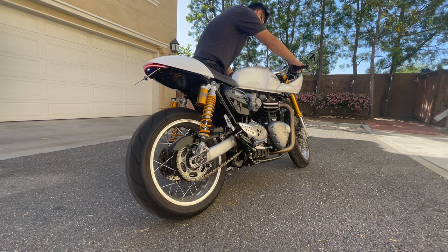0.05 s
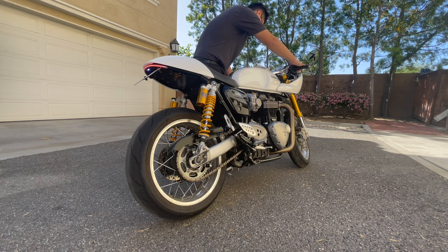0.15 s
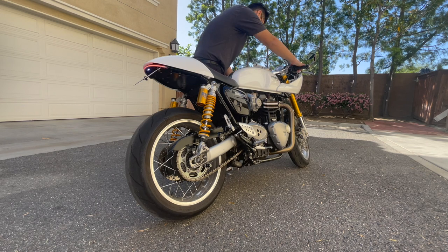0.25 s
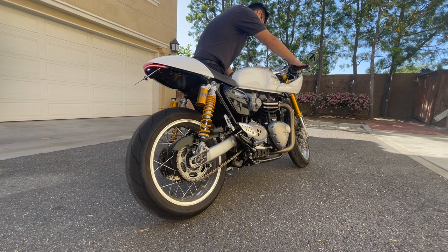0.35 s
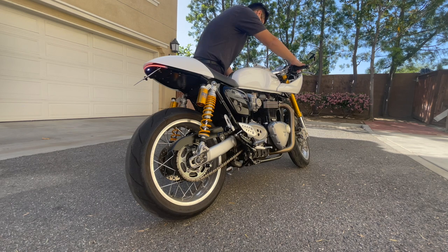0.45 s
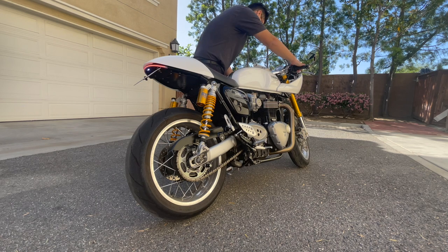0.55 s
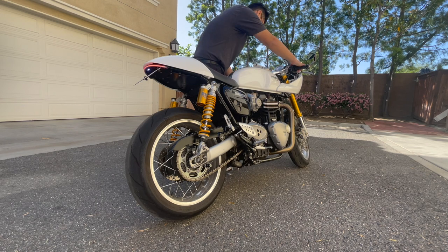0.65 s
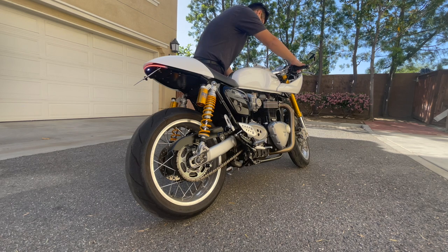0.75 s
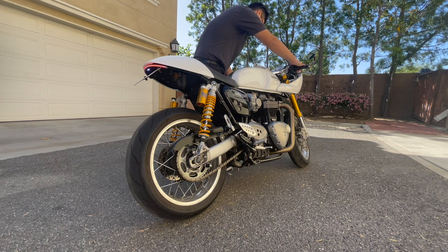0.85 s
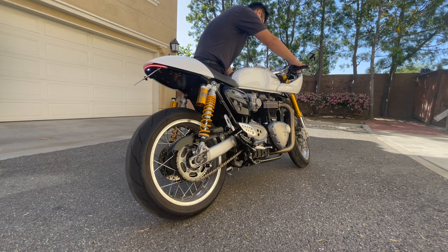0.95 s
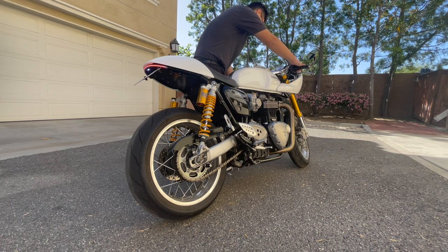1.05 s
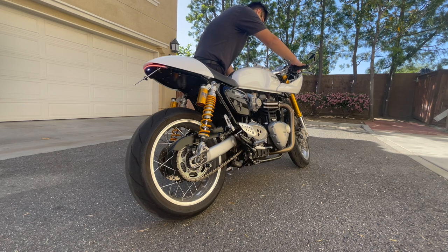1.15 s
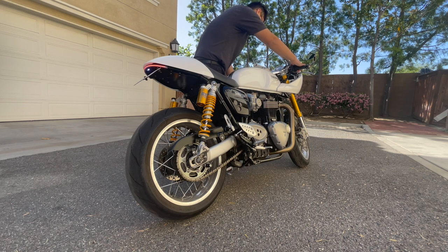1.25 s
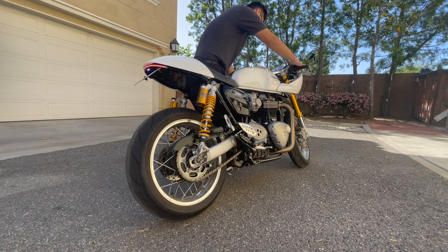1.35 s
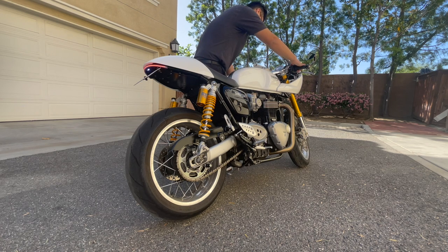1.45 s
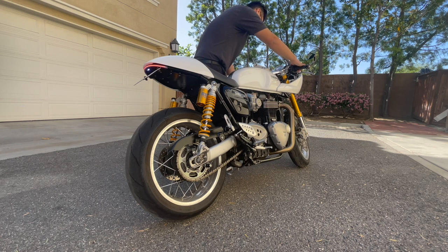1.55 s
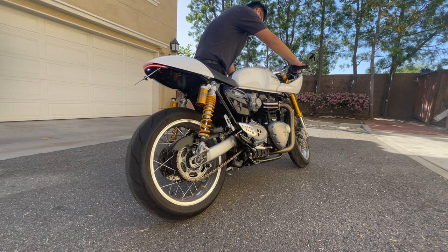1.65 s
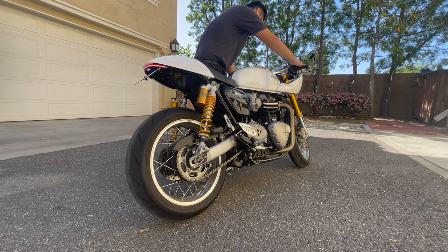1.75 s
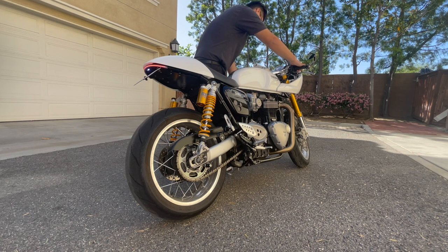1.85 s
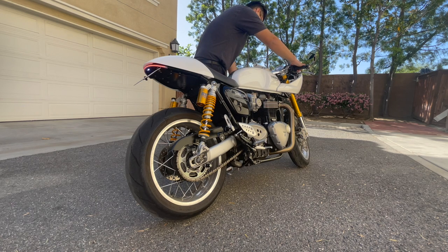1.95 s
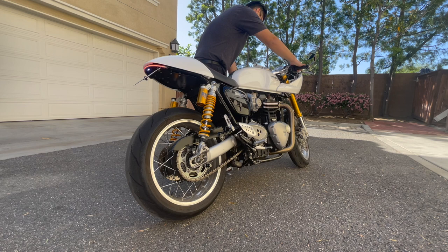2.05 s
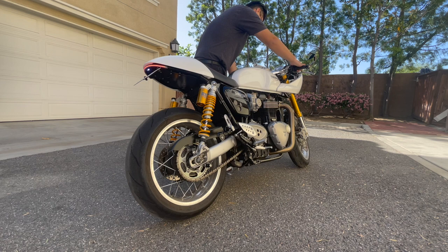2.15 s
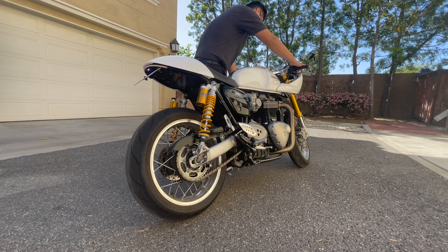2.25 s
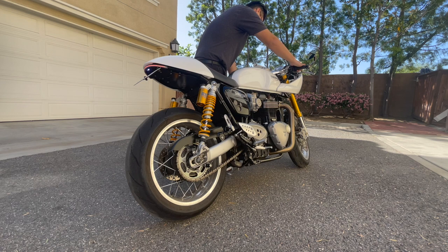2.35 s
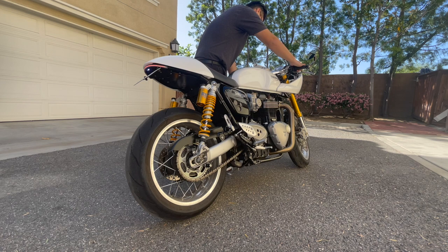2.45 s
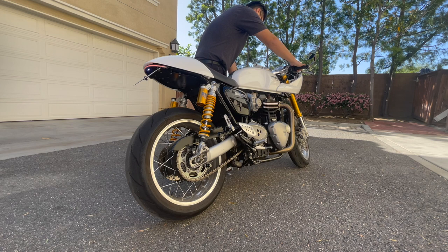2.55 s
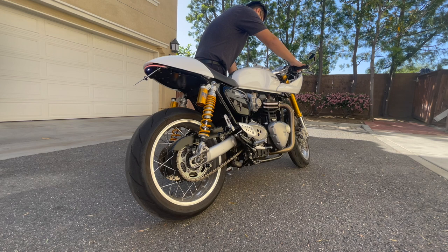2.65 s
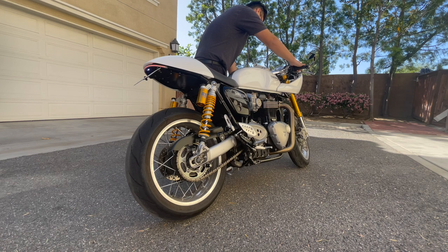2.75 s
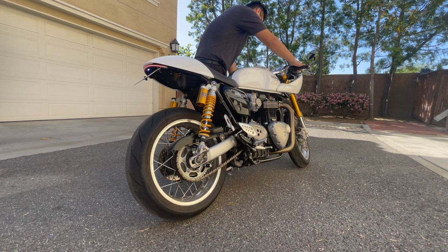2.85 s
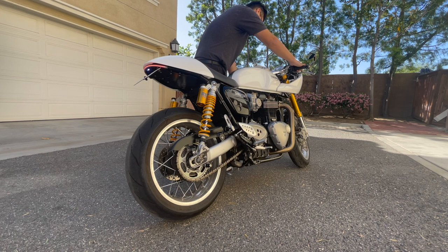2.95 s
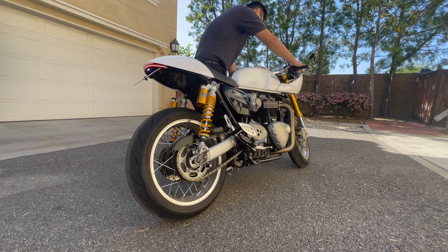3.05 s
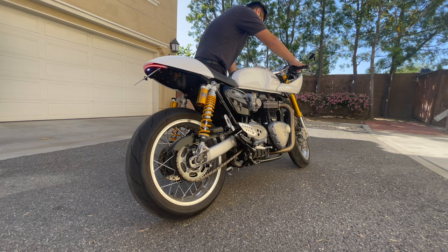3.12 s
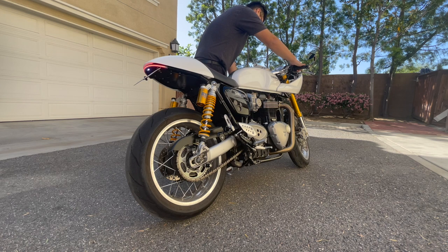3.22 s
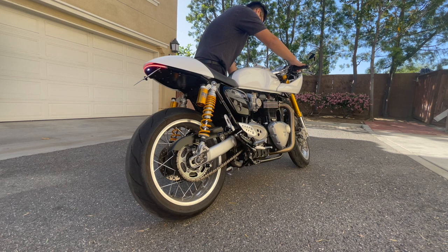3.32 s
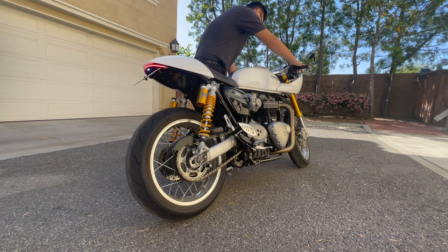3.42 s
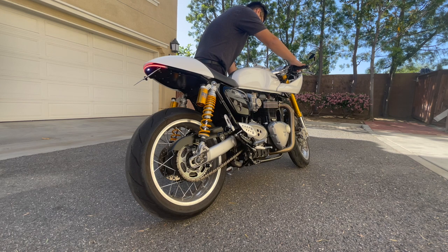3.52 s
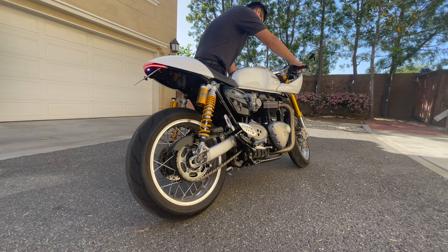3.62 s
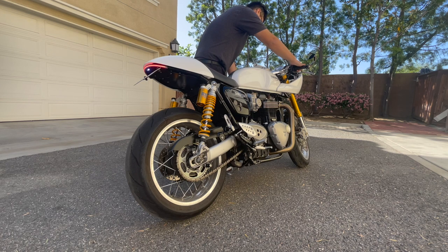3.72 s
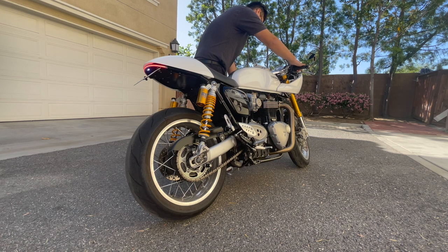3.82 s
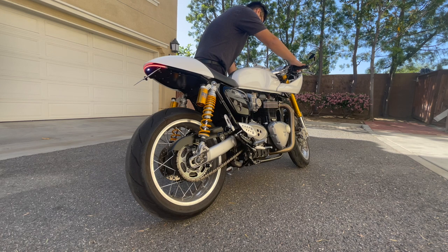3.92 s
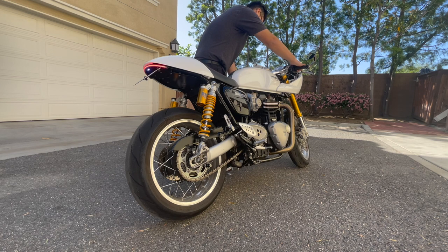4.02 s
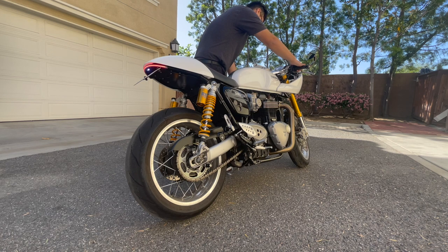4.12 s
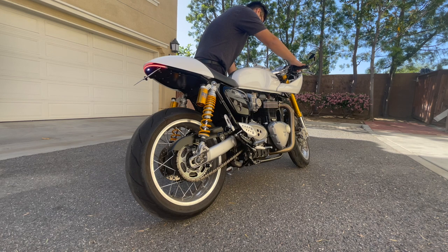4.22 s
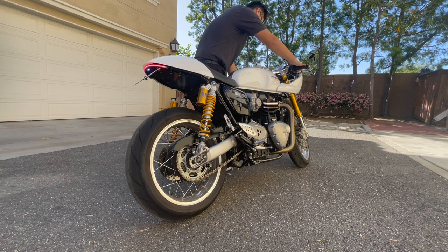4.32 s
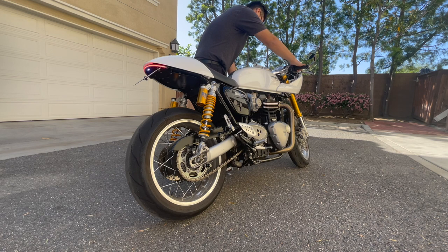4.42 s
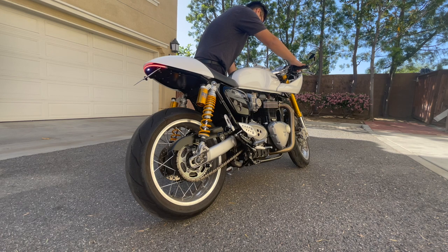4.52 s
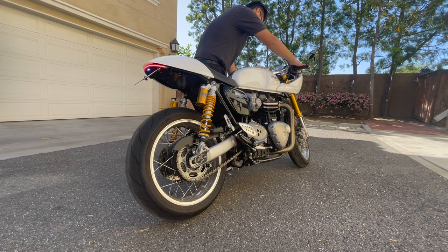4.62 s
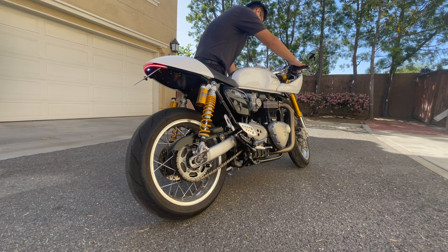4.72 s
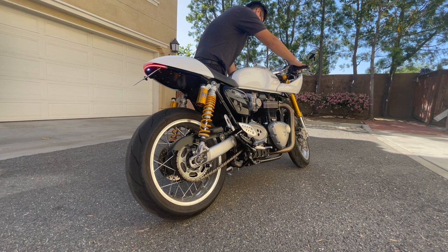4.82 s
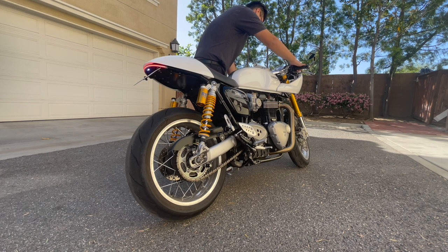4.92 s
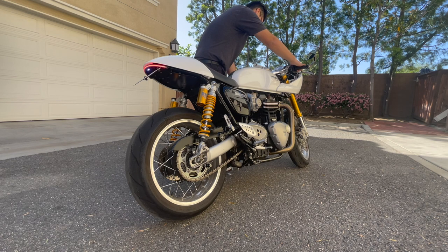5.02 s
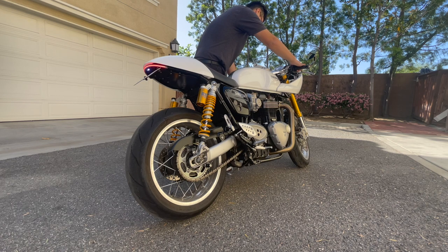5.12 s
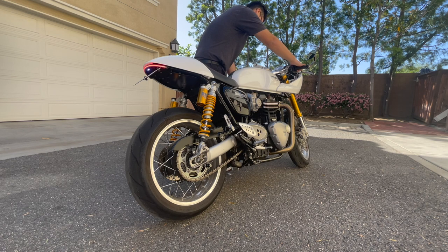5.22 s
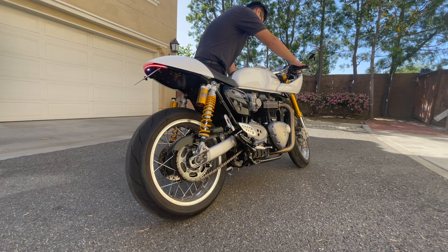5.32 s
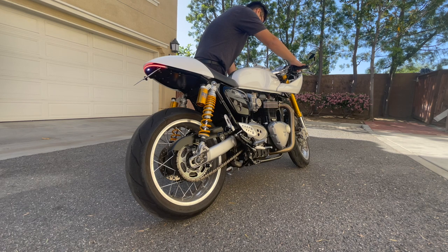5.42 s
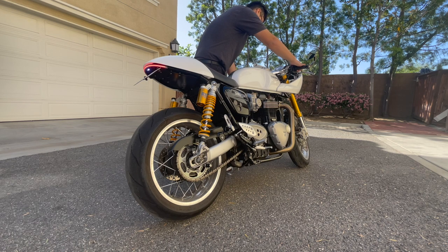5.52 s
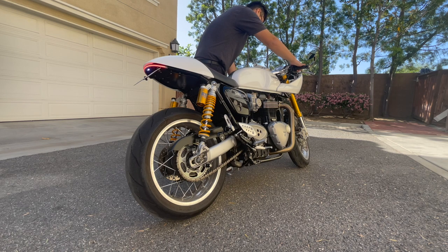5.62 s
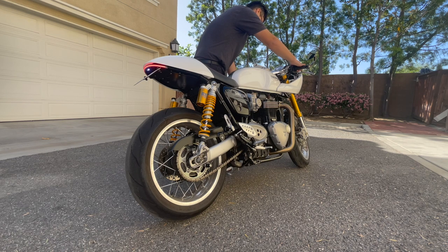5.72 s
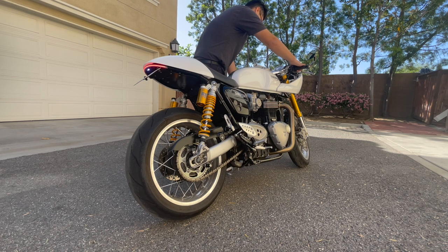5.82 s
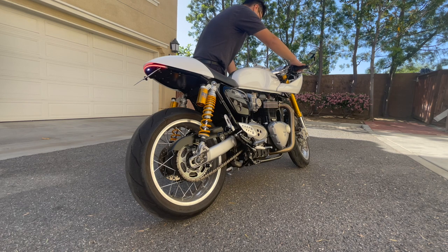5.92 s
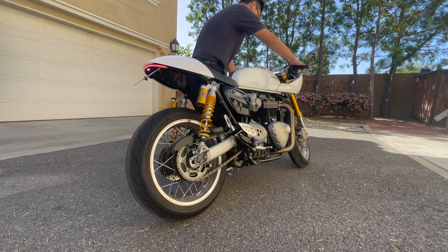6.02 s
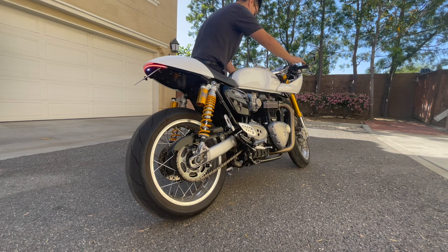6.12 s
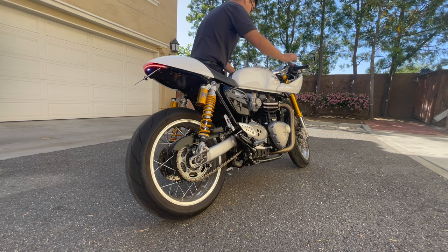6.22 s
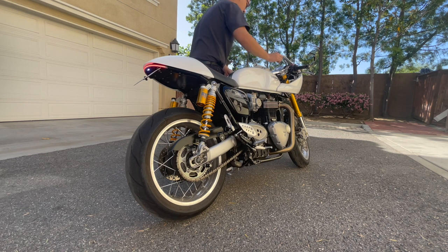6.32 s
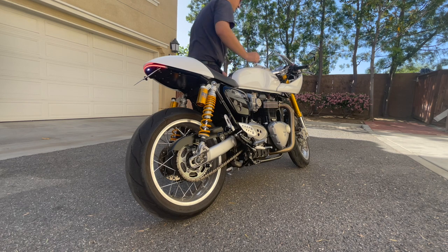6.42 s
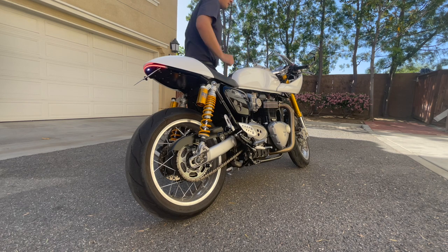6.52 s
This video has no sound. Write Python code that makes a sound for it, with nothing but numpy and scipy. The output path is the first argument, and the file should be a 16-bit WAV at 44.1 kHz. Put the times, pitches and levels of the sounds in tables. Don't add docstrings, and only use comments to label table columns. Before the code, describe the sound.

A walled driveway, quiet at first: low distant traffic, thin insect hum, leaves and small bird whistles, one faint lever click. Just after two seconds a solenoid clacks and the starter whines in short pulses with low air puffs. The twin engine catches loudly, races, then drops to an uneven throbbing idle with valve clatter. The small outdoor microphone is close, with the bike slightly left and walls echoing.

```python
import sys
import numpy as np
from scipy import signal
from scipy.fft import rfft, irfft, next_fast_len
from scipy.io import wavfile
from scipy.ndimage import uniform_filter1d

SR = 44100
rng = np.random.default_rng(int(sys.argv[2]) if len(sys.argv) > 2 else 0)


def wav_record(signal):
    frames = np.transpose(np.atleast_2d(signal))
    bounded = np.clip(frames, -1, 1)
    quanta = np.round(bounded * 32767).astype(np.int16)
    wavfile.write(sys.argv[1], SR, quanta)


def makeup_ratio(level_db):
    decades = np.asarray(level_db, float) / 20
    return 10 ** decades


N = 289737


def rms_one(x):
    return x / np.sqrt(np.mean(x ** 2) + 1e-20)


def in_time(rows):
    s, *columns = np.transpose(rows)
    return [np.interp(np.arange(N) / SR, s, c) for c in columns]


def after(start_s, stop_s=7):
    t = np.arange(N) / SR
    return (t > start_s) & (t < stop_s)


def at_hz(points, hz):
    point_hz, value = np.transpose(points)
    return np.interp(np.log(np.maximum(hz, 1)), np.log(point_hz), value)


def drift(rate_hz):
    r = np.exp(-80 * np.pi * rate_hz / SR)
    white = rng.standard_normal(N // 40 + 2002)
    slow = signal.lfilter([1], [1, -2 * r, r * r], white)[2000:]
    return np.interp(np.arange(N) / 40, np.arange(len(slow)), rms_one(slow))


def train(times_s, sizes):
    out = np.zeros(N)
    at = np.round(np.asarray(times_s) * SR).astype(int)
    out[at[at < N]] = np.asarray(sizes)[at < N]
    return out


def decay(x, t60_s):
    return signal.lfilter([1], [1, -makeup_ratio(-60 / (t60_s * SR))], x)


def ring(x, hz, t60_s):
    r, w = makeup_ratio(-60 / (t60_s * SR)), 2 * np.pi * hz / SR
    return signal.lfilter([0, np.sin(w)], [1, -2 * r * np.cos(w), r * r], x + 1e-18)


def resonate(x, hz, width_hz):
    r = np.exp(-np.pi * width_hz / SR)
    poles = [1, -2 * r * np.cos(2 * np.pi * hz / SR), r * r]
    return signal.lfilter([(1 - r * r) / 2, 0, (r * r - 1) / 2], poles, x)


def resonate_twice(x, hz, width_hz):
    return resonate(resonate(x, hz, width_hz), hz, width_hz)


def soften(x, hz):
    return signal.sosfilt(signal.butter(2, hz, fs=SR, output="sos"), x)


def steep(x, hz, kind):
    return signal.sosfilt(signal.butter(4, hz, kind, fs=SR, output="sos"), x)


def tone(x, gain_at):
    size = next_fast_len(N + 4096)
    hz = np.arange(size // 2 + 1) * SR / size
    return irfft(rfft(x, size) * gain_at(hz), size)[..., :N]


def coloured(white, spectrum, likeness):
    def weights(hz):
        alike = np.clip(at_hz(likeness, hz), -1, 1)
        return makeup_ratio(at_hz(spectrum, hz)) * np.sqrt([1 + alike, 1 - alike])
    mid, side = tone(white, weights)
    return rms_one(np.array([mid + side, mid - side]))


def envelope(rows, rise, sag, fall):
    t = np.arange(N) / SR
    events_db = []
    for s, hold_s, db in rows:
        attack = rise * np.maximum(s - t, 0)
        held = sag * np.clip(t - s, 0, hold_s)
        release = fall * np.maximum(t - s - hold_s, 0)
        events_db.append(db - attack - held - release)
    return np.max(events_db, axis=0)


def yard(x, t60_s):
    t = np.arange(SR // 2) / SR
    mid, side = rng.standard_normal((2, len(t))) * makeup_ratio(-60 * t / t60_s) * (t > .006)
    tail = steep(mid, 138, "high") + steep(side, 234, "high") * [[1.8], [-1.8]]
    return signal.fftconvolve(x[None], tail / np.sqrt(np.sum(tail ** 2) / 2), axes=1)[:, :N]


# time in seconds, exhaust level in dB.
LOAD_DB = [
    (2.9, -23.5),
    (3.0, -10.5),
    (3.5, -11),
    (3.9, -10.5),
    (4.1, -14),
    (4.5, -12),
    (5.4, -15),
    (5.85, -12.5),
    (6.57, -13),
]
# time in seconds, level in dB against the load.
FIRST_FIRING = [
    (2.926, 2),
]
# time in seconds, level change in dB.
LEAN_FIRINGS = [
    (4.27, -5),
    (4.45, -6),
    (4.82, -5.5),
    (5.4, -8),
    (5.685, -0.5),
    (6.21, -0.5),
]


def engine():
    t = np.arange(N) / SR
    first_cycle_s, second_cylinder, intake_shuts = 3.0104, .364, .66
    exhaust_db, = in_time(LOAD_DB)

    catch_s, catch_db = np.transpose(FIRST_FIRING)
    first_s = moments(0, first_cycle_s)
    second_s = moments(second_cylinder, first_cycle_s)
    second_s = second_s + 0.00069 * rng.standard_normal(len(second_s))
    fired_s = np.r_[catch_s, first_s, second_s]
    is_second = np.r_[0 * catch_s, 0 * first_s, 0 * second_s + 1]
    pattern_db = np.r_[catch_db, 0 * first_s, 0 * second_s - 1.2]
    for s, db in LEAN_FIRINGS:
        pattern_db[np.argmin(np.abs(fired_s - s))] += db
    strength_db = pattern_db + exhaust_db[(fired_s * SR).astype(int)] + 13
    pipes = exhaust(fired_s, is_second, strength_db)
    echoes = makeup_ratio(-4.5) * yard(pipes, t60_s=0.36) * makeup_ratio([[1.5], [-1.5]])

    dry_db = 7.5 * np.exp(-np.maximum(t - first_cycle_s, 0) / 1)
    clatter_db = -38.5 + dry_db + 0.22 * (exhaust_db - exhaust_db[-1])
    noise = makeup_ratio(clatter_db + 2) * clatter(fired_s, moments(intake_shuts, first_cycle_s))
    return pipes + echoes + noise + fuel_pump() + bracket()


# lag in seconds, signed share.
REFLECTIONS = [(0, 0.69), (0.0119, -0.53), (0.0135, -.95), (.0278, -0.29)]
# frequency in Hz, level in dB, t60 in seconds, travel lag in seconds.
PIPE_MODES = [(53.4, -15.5, 0.26, 0.019), (96, -17, 0.019, 0.004), (121.8, -14, 0.11, 0.00988),
              (160, -14, 0.041, 0.00595), (197.3, -12.5, 0.081, 0.0075), (284.3, -16.5, 0.16, 0.00789),
              (349.3, -21, 0.071, 0.00456), (528.1, -27.5, 0.2, 0.0019)]
# frequency in Hz, level in dB against the first pipe.
SECOND_PIPE_DB = [(55, 0.5), (120, -0.5), (196, 5), (287, -3.5), (530, -0.5)]


def exhaust(fired_s, is_second, strength_db):
    spread_db, mode_spread_db = 0.93, 2
    chance = rng.standard_normal((len(fired_s), len(PIPE_MODES) + 1))
    level_db = strength_db + spread_db * chance[:, 0]
    blasts = sum(train(fired_s + lag_s, share * makeup_ratio(level_db)) for lag_s, share in REFLECTIONS)
    out = soften(ring(blasts, hz=230.4, t60_s=0.045), hz=435)
    for k, (hz, db, t60_s, lag_s) in enumerate(PIPE_MODES):
        cylinder_db = (is_second - .5) * at_hz(SECOND_PIPE_DB, hz)
        mode_db = level_db + db + cylinder_db + mode_spread_db * chance[:, k + 1]
        out += ring(train(fired_s + lag_s, makeup_ratio(mode_db)), hz, t60_s)
    return soften(out, hz=830)


# time in seconds, turns per minute.
CRANK_RPM = [(3.0, 1145.4), (3.1, 1343.4), (3.261, 1456.5), (3.413, 1438.1), (3.73, 1597.5),
             (3.856, 1569.0), (4.285, 1338.3), (4.672, 1302.9), (4.961, 1219.5), (5.193, 1259.7),
             (5.355, 1218.6), (5.949, 1380.5), (6.57, 1370.2)]


def moments(share, first_cycle_s):
    cycles = np.cumsum(in_time(CRANK_RPM)[0] * after(first_cycle_s)) / (120 * SR)
    wanted = np.arange(int(cycles[-1] - share) + 1) + share + 1e-6
    return np.interp(wanted, cycles, np.arange(N) / SR)


# frequency in Hz, density in dB per Hz.
CLATTER_COLOUR = [(350, -1.5), (600, -7.5), (815, -11.5), (1520, -10), (1660, -14), (2150, -16),
                  (3270, -20), (7390, -27), (7980, -36.5), (8950, -22), (10000, -26), (11300, -25.5),
                  (12600, -41), (16400, -43), (22000, -120)]
# frequency in Hz, left-right likeness.
ENGINE_LIKENESS = [(60, 0.17), (170, 0.37), (500, 0.22), (1450, 0.28), (4210, 0.26), (8500, 0.014),
                   (10000, -1.2), (11800, 0.22)]


def clatter(fired_s, shut_s):
    at_s = np.r_[fired_s, shut_s]
    is_shut = np.arange(len(at_s)) >= len(fired_s)
    chance = np.clip(rng.standard_normal((len(at_s), 2)), -2, 1.5)
    swell_db = 3 * chance[:, 0] - 3 * is_shut
    tick_db = 4.5 * chance[:, 1] - 8 * is_shut
    swell = soften(decay(train(at_s - .002, makeup_ratio(swell_db)), t60_s=.07), hz=150)
    ticks = soften(decay(train(at_s - .002, makeup_ratio(tick_db)), t60_s=0.017), hz=250)

    white = rng.standard_normal((2, N))
    dull = soften(white, hz=3650)
    air = steep(white, 9020, "high")
    excite = dull * (1 + .5 * swell + 0.13 * ticks)
    excite += (white - dull) * (0.69 + 0.73 * swell + 1.55 * ticks)
    excite += air * (6.8 * swell ** 2 + 2.6 * ticks)
    excite[0] += 0.89 * cases(excite[0], flutter_db=4.5)
    return coloured(excite * makeup_ratio(1.6 * drift(26.3)) * after(2.92), CLATTER_COLOUR, ENGINE_LIKENESS)


# frequency in Hz, width in Hz, level in dB.
CASE_MODES = [(1493, 80, -8), (2090, 137, 6.5), (2617, 220, -1.5), (4300, 110, -28), (5000, 110, -9.5),
              (5996, 184, 1.5), (6420, 82, 2.5), (7510, 206, 5), (8660, 940, -12.5), (11970, 110, 9)]


def cases(x, flutter_db):
    flutter = makeup_ratio(flutter_db * drift(49))
    out = 0
    for k, (hz, width_hz, db) in enumerate(CASE_MODES):
        lit = makeup_ratio(db) * np.roll(flutter, 9000 * k) * (-1) ** k
        out = out + lit * resonate_twice(x, hz, width_hz)
    return out


def fuel_pump():
    pump = resonate_twice(rng.standard_normal(N), hz=7300, width_hz=68)
    return rms_one(pump) * makeup_ratio(-64 + 6.2 * drift(1.6)) * after(2.3)


def bracket():
    rattle = resonate_twice(rng.standard_normal((2, N)), hz=2330, width_hz=260)
    rattle_db = envelope([(5.6, 1, -52)], rise=40, sag=0, fall=0)
    return rms_one(rattle) * makeup_ratio(rattle_db + 2.24 * drift(21.4))


# frequency in Hz, density in dB per Hz.
GRIND_COLOUR = [(240, -15.5), (400, -7), (734, -8.5), (1450, 6.5), (1650, 0), (2690, -1.5), (2980, -3.5),
                (5310, -4.5), (7400, -2), (9460, -4), (10200, -44), (11100, -1), (12600, -42), (16400, -70),
                (22000, -120)]


def starter():
    mesh_hz, whine_db, grind_db = pinion()
    turn = np.cumsum(mesh_hz * (1 + 0.0053 * drift(110))) / SR
    teeth = sum(np.sin(2 * np.pi * k * turn) * makeup_ratio(3 * drift(140)) for k in range(1, 8))
    teeth *= 1 + 0.47 * np.sin(2 * np.pi * turn / 3.9)
    teeth = (teeth + 0.5 * rng.standard_normal(N)) * makeup_ratio(whine_db) * after(2.19, 2.94)
    whine = cases(teeth, flutter_db=3) + 0.2 * teeth

    grind = coloured(rng.standard_normal((2, N)), GRIND_COLOUR, ENGINE_LIKENESS)
    dull = soften(grind, hz=3600)
    grind = dull + (grind - dull) * makeup_ratio(0.27 * (grind_db - grind_db.max()))
    grind = grind * makeup_ratio(grind_db - 3) * after(2.185)
    return whine + makeup_ratio(-6) * yard(whine, t60_s=.2) + grind + unfired_air()


# time in seconds, tooth mesh in Hz, whine in dB.
SPIN_UP = [
    (2.191, 419.5, -47),
    (2.224, 635.4, -28.5),
    (2.28, 1083, -26),
    (2.296, 1101, -55),
    (2.312, 1306, -28.5),
    (2.365, 1397, -22),
    (2.379, 1311, -20),
    (2.396, 1066, -24),
    (2.43, 1042, -58),
]
# start in seconds, length in seconds, first mesh in Hz, last mesh in Hz, whine in dB.
STROKES = [
    (2.505, 0.028, 1525, 1223, -21.5),
    (2.606, .042, 1502, 1400, -22.5),
    (2.727, 0.028, 1533, 1207, -19.5),
    (2.859, 0.026, 1508, 1264, -22),
]


def pinion():
    t = np.arange(N) / SR
    mesh_rows = [(s, hz) for s, hz, db in SPIN_UP]
    slams = []
    for s, hold_s, first_hz, last_hz, db in STROKES:
        mesh_rows += [(s, first_hz), (s + hold_s, last_hz), (s + hold_s + 0.02, last_hz)]
        slams.append((s, hold_s, db))
    mesh_hz, = in_time(mesh_rows)
    whine_db = np.maximum(in_time(SPIN_UP)[1], envelope(slams, rise=3000, sag=111, fall=1496))
    fading_db = 213 * t
    grind_db = np.maximum.accumulate(-8 + 0.57 * whine_db + fading_db) - fading_db
    coast_db = -30 - 62 * np.maximum(t - 2.96, 0)
    return mesh_hz, whine_db, np.maximum(grind_db, coast_db)


# time in seconds, peak in dB, ring in
# Hz.
PUFFS = [
    (2.324, -20.5, 150),
    (2.366, -14, 68),
    (2.483, -4.5, 65.7),
    (2.575, -16.5, 111.7),
    (2.621, -7, 59.15),
    (2.701, -10, 160),
    (2.717, -11.5, 64.4),
    (2.839, -5, 65.4),
    (2.93, 3, 150),
]
# time in seconds, level in dB.
WHEEZES = [
    (2.33, -37),
    (2.474, -31.5),
    (2.71, -29),
    (2.836, -34),
    (2.915, -23.5),
]


def unfired_air():
    puffs = sum(ring(train([s], [makeup_ratio(db)]), hz, 3 / hz) for s, db, hz in PUFFS)
    puffs = steep(puffs + 0.0012 * ring(puffs, hz=56.4, t60_s=0.45), 280, "low")
    wheeze_db = envelope([(s, 0, db) for s, db in WHEEZES], rise=500, sag=0, fall=73)
    draught = rng.standard_normal(N)
    wheeze = sum(resonate(resonate(draught, hz, 62), hz, 66) for hz, *_ in PIPE_MODES[2:5])
    return puffs + rms_one(wheeze) * makeup_ratio(wheeze_db - 3) * after(2.25)


# time in seconds, peak in dB, ring in Hz, t60 in seconds.
CLICKS = [
    (1.355, -47.5, 2220, 0.028),
    (2.1816, -18.5, 6220, 0.019),
    (2.924, -31, 4300, .02),
    (3.007, -28.5, 4200, .02),
    (3.042, -27.5, 5650, 0.018),
    (5.682, -28, 1300, 0.041),
]


def clicks():
    out = np.zeros(N)
    for s, db, hz, t60_s in CLICKS:
        hit = train([s], [makeup_ratio(db)])
        crack = decay(hit, t60_s) * rng.standard_normal(N)
        out += 0.99 * soften(crack, hz=2.1 * hz)
        out += 0.83 * ring(hit, hz, t60_s) + 0.47 * ring(hit, 0.66 * hz, t60_s)
    return steep(out, 774, "high")


def birds():
    out, waver, flutter = np.zeros(N), drift(180), makeup_ratio(3.6 * drift(220))
    for s, length_s, start_hz, end_hz, db in song():
        span = slice(round(s * SR), round((s + length_s) * SR))
        share = np.linspace(0, 1, span.stop - span.start)
        hz = start_hz + (end_hz - start_hz) * share + 90 * waver[span]
        swell = np.sin(np.pi * share) ** .5
        out[span] += makeup_ratio(db - 7) * swell * np.sin(2 * np.pi * np.cumsum(hz) / SR)
    twitter = resonate(rng.standard_normal((2, N)), hz=3850, width_hz=1800)
    twitter = 4.1 * resonate(twitter, hz=3970, width_hz=2300) * uniform_filter1d(np.abs(out), size=3000)
    direct = out * flutter
    return twitter + direct * makeup_ratio([[2], [-2]]) + makeup_ratio(-2) * yard(direct, t60_s=.4)


# start in seconds, length in seconds, top in Hz, bottom in Hz, level in dB.
PHRASES = [
    (0.087, 0.089, 4900, 2900, -57),
    (0.187, 0.14, 5170, 3120, -54.5),
    (1.374, .125, 5460, 2930, -53.5),
    (1.51, 0.04, 3700, 3240, -60),
]
# start in seconds, length in seconds, start in Hz, end in Hz, level in dB.
WHISTLES = [(.855, 0.031, 5000, 5860, -59), (.885, 0.055, 4770, 3900, -55),
            (.945, 0.031, 4750, 5330, -48.5), (.97, 0.022, 5460, 7000, -52), (.992, .016, 5900, 4900, -52),
            (1.0, .09, 4170, 4150, -56), (1.077, .02, 3000, 2980, -54), (1.397, .022, 4870, 4950, -44.5),
            (1.751, 0.14, 3280, 3170, -62), (1.91, 0.075, 4280, 4300, -55),
            (2.014, .029, 4800, 4630, -39.5), (2.04, 0.014, 4200, 3600, -64),
            (2.055, 0.06, 4717, 4630, -55), (2.072, .027, 4800, 5550, -51), (2.1, 0.044, 2560, 4300, -50),
            (2.13, 0.017, 3600, 2900, -56)]


def song():
    note_s, fall_hz, scatter_hz, scatter_db = .026, 200, 150, -0.5
    notes, phrases = list(WHISTLES), list(PHRASES)
    for s, length_s, top_hz, bottom_hz, db in PHRASES:
        phrases.append((s + .04, length_s, .86 * top_hz, bottom_hz, db - 4))
    for s, length_s, top_hz, bottom_hz, db in phrases:
        chance = rng.standard_normal((12, 2))
        for k, at_s in enumerate(np.arange(0, length_s - note_s / 2, note_s)):
            hz = bottom_hz + (top_hz - bottom_hz) * (1 - at_s / length_s) ** 1.4
            hz += scatter_hz * chance[k, 0]
            notes.append((s + at_s, 1.08 * note_s, hz, hz - fall_hz, db + scatter_db * chance[k, 1]))
    return notes


# frequency in Hz, density in dB per Hz.
STREET_COLOUR = [(15, -36), (25, 4.5), (97, 2.5), (540, -21), (1010, -18.5), (1840, -34), (4460, -32.5),
                 (4820, -31), (6760, -48), (7500, -28), (8550, -65), (11400, -51), (12600, -76),
                 (16400, -106), (22000, -120)]
# frequency in Hz, left-right likeness.
STREET_LIKENESS = [(60, 1), (170, 1), (500, 0.1), (1450, 0.68), (4210, 0.077), (12200, 0.97)]
# frequency in Hz, width in Hz, level in dB.
INSECTS = [(2000, 39, -80), (4900, 160, -75), (5820, 180, -73.5), (7670, 130, -75)]
# start in seconds, length in seconds, level in dB.
RUSTLES = [
    (.16, .01, -70.5),
    (.26, 0.034, -71),
    (.58, .27, -74),
    (.92, .07, -77),
    (1.36, .01, -80),
    (1.6, .02, -76),
    (2.04, .02, -77),
]


def street():
    street_db, traffic_db, swing_db, left_db, lead_s = -47.5, -50, 1, 3, .0005
    rumble = coloured(rng.standard_normal((2, N)), STREET_COLOUR, STREET_LIKENESS) * makeup_ratio(street_db)
    deep = soften(rumble, hz=510)
    rumble += deep * (makeup_ratio(traffic_db + swing_db * drift(3.3) - street_db) - 1)
    rumble[1] = np.roll(rumble[1], round(lead_s * SR))
    rumble *= makeup_ratio([[left_db / 2], [-left_db / 2]])

    white = rng.standard_normal((2, N))
    insects = sum(rms_one(resonate_twice(white, hz, width_hz)) * makeup_ratio(db) for hz, width_hz, db in INSECTS)
    rustle_db = envelope(RUSTLES, rise=800, sag=0, fall=350)
    leaves = steep(steep(white, 6200, "high"), 12000, "low")
    return rumble + rms_one(leaves) * makeup_ratio(rustle_db) + insects


# frequency in Hz, left minus right in dB.
LEFT_BIAS_DB = [(60, 1.5), (150, 1.5), (350, 3.0), (850, 3.5), (2070, 3.0), (5020, 4.5), (12200, 0.5)]
# frequency in Hz, gain in dB.
MICROPHONE_DB = [(9000, -0.5), (9750, 4), (9950, -27), (10450, -1.5), (10700, 4), (12500, -4), (13100, -7),
                 (14100, -4), (15000, -8)]


def scene():
    machine = engine() + starter() + clicks()
    machine = tone(machine, lambda hz: makeup_ratio(at_hz(LEFT_BIAS_DB, hz) * [[.5], [-.5]]))
    return tone(machine + birds() + street(), lambda hz: makeup_ratio(at_hz(MICROPHONE_DB, hz)))


def top_cut(x):
    return signal.sosfilt(signal.butter(12, 15900, fs=SR, output="sos"), x)


def record(dry):
    thin = steep(dry, 49.6, "high")
    return top_cut(0.81 * np.tanh(thin / 0.7))


dry = scene()
out = record(dry)
wav_record(out)
```